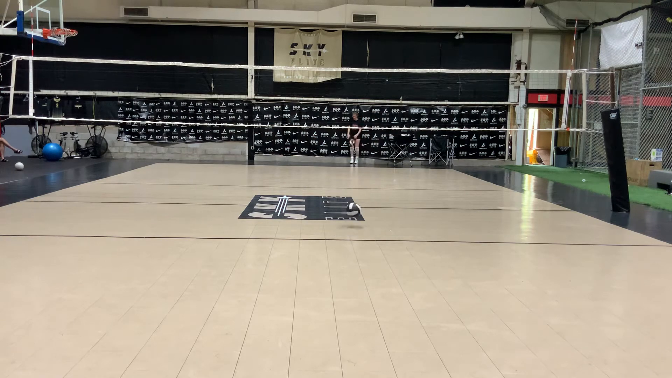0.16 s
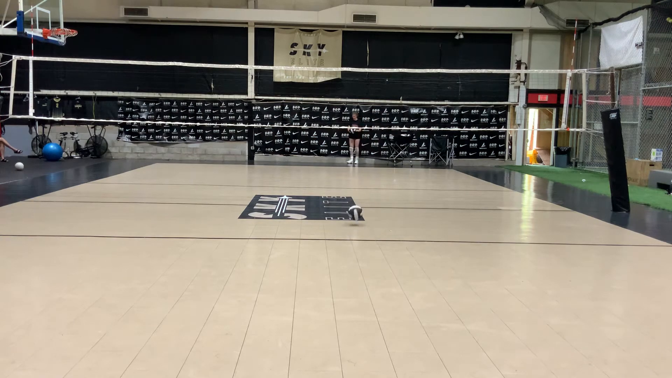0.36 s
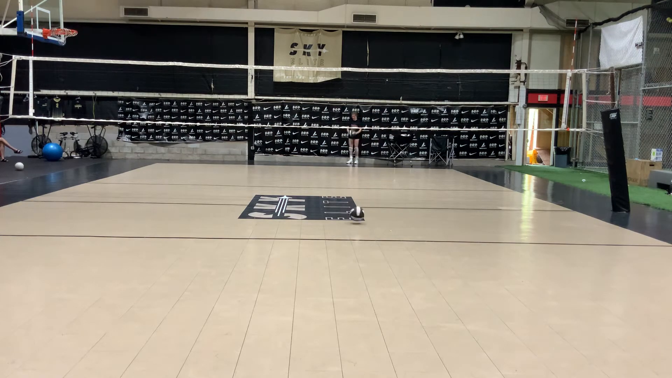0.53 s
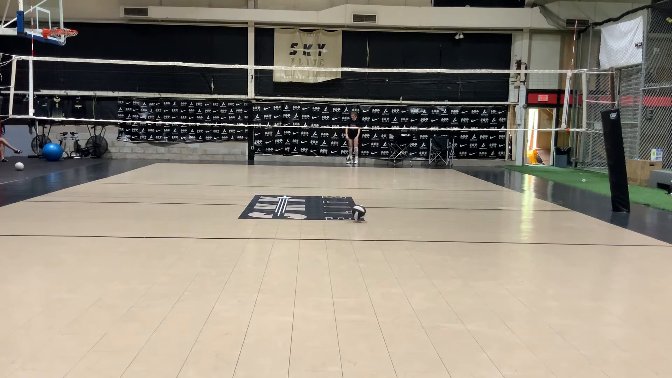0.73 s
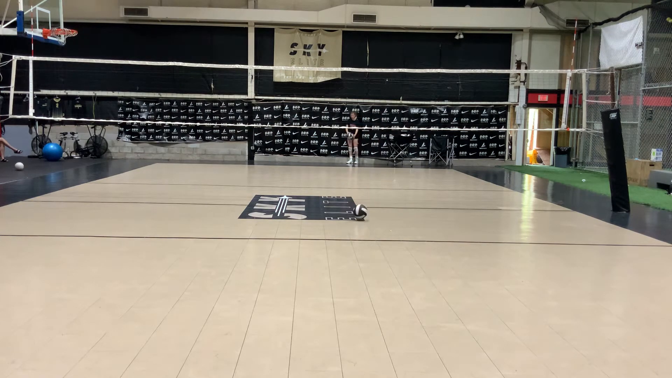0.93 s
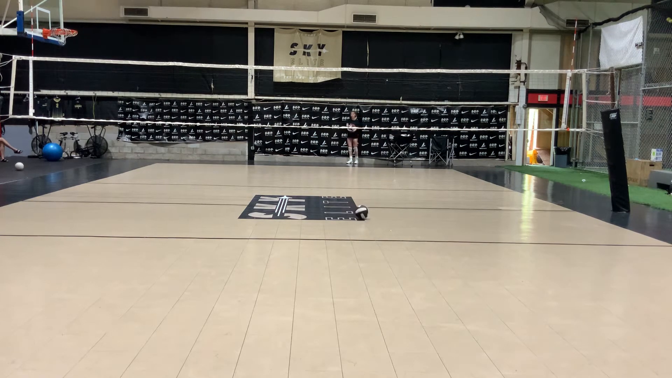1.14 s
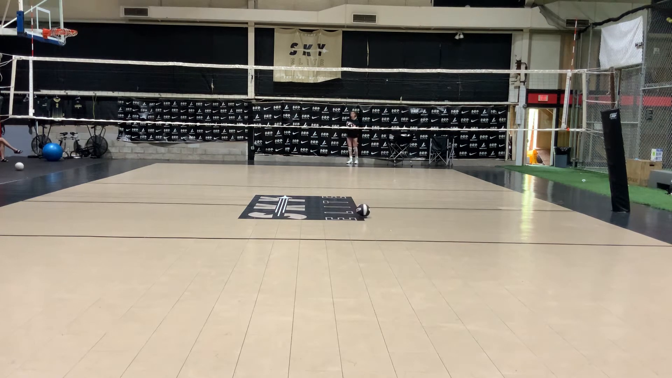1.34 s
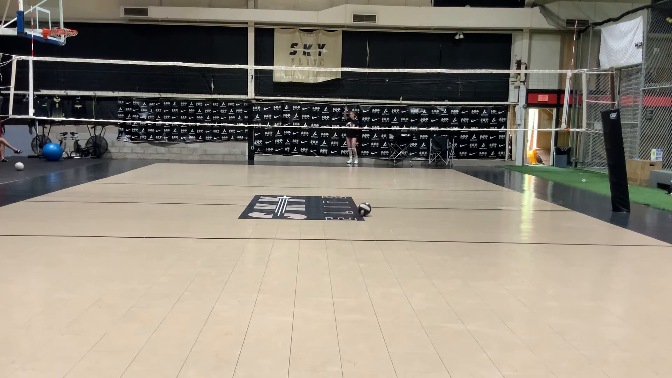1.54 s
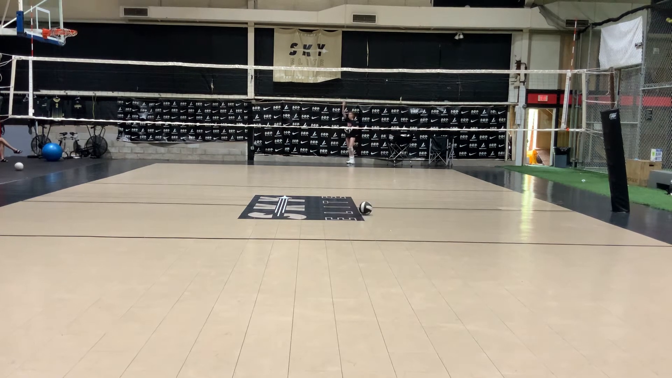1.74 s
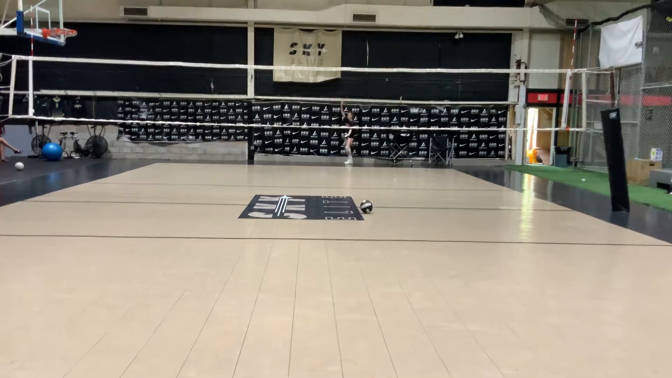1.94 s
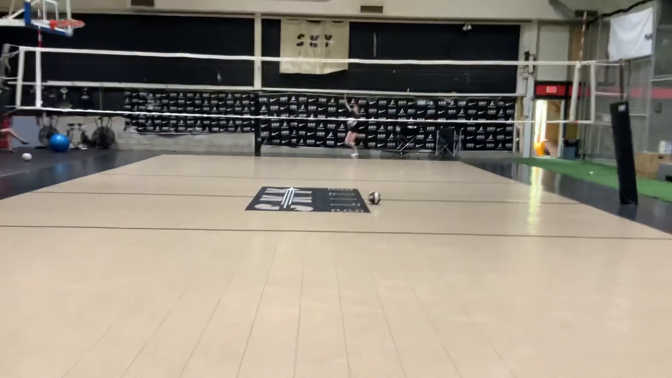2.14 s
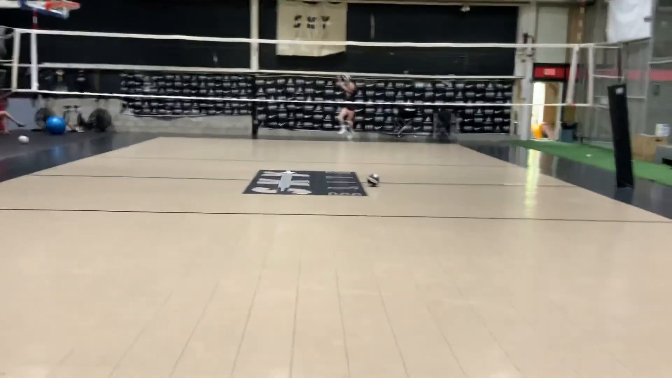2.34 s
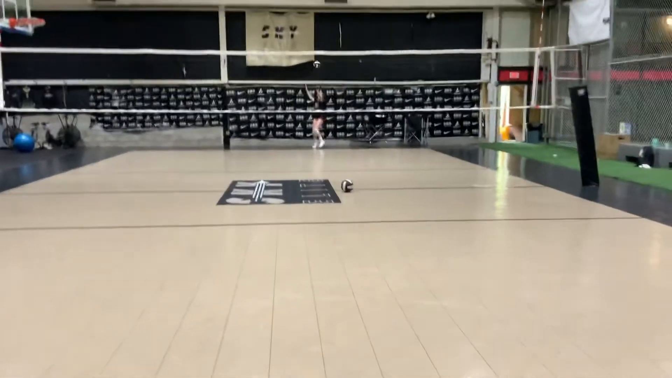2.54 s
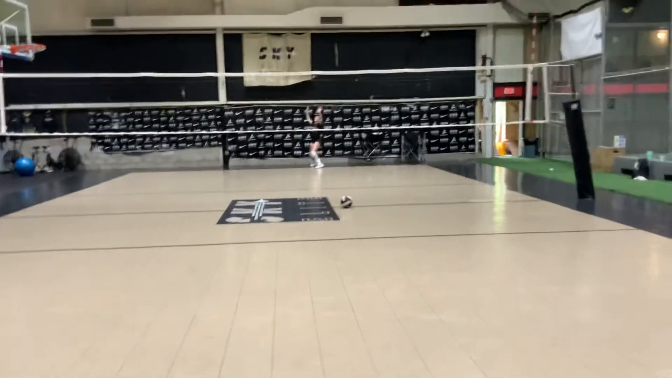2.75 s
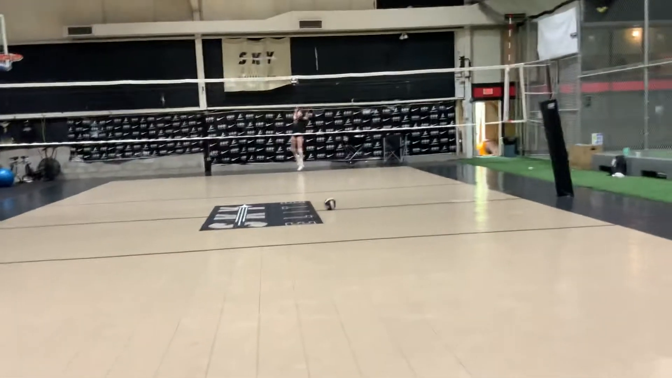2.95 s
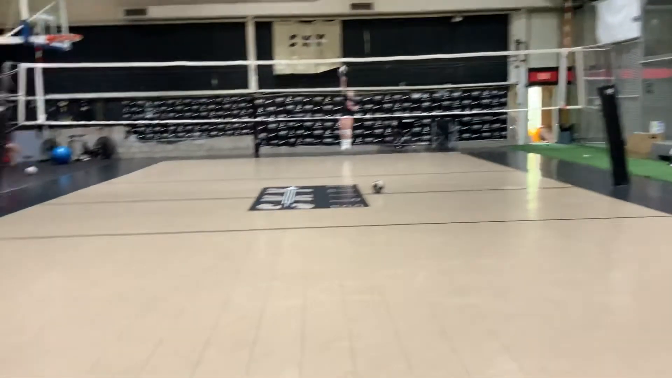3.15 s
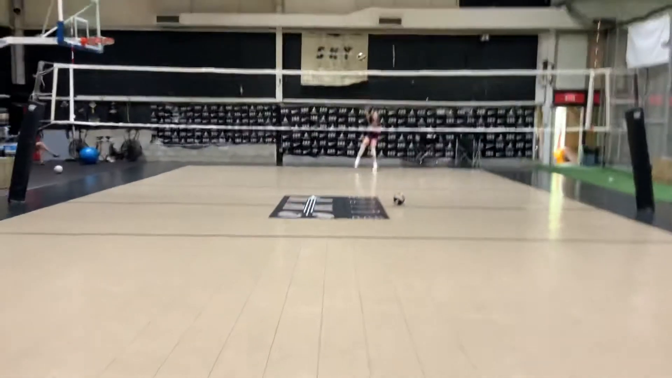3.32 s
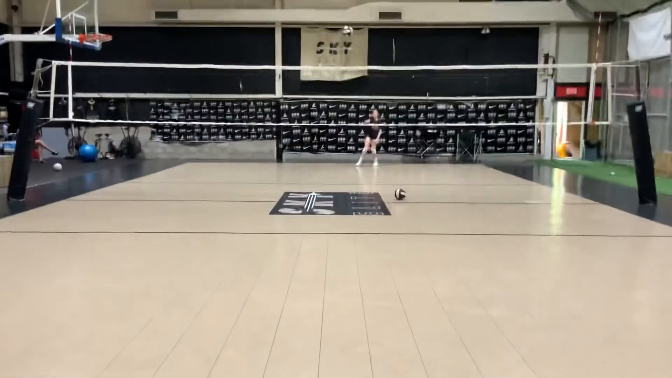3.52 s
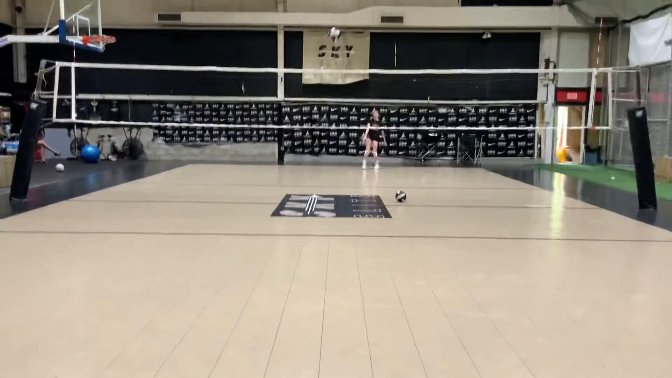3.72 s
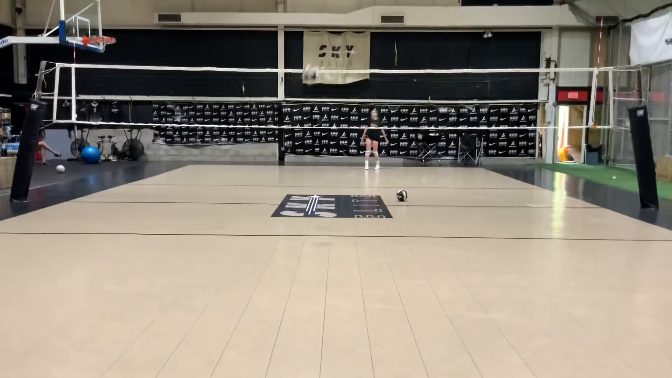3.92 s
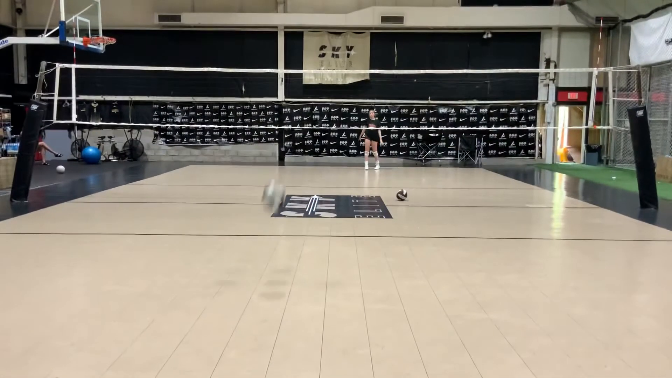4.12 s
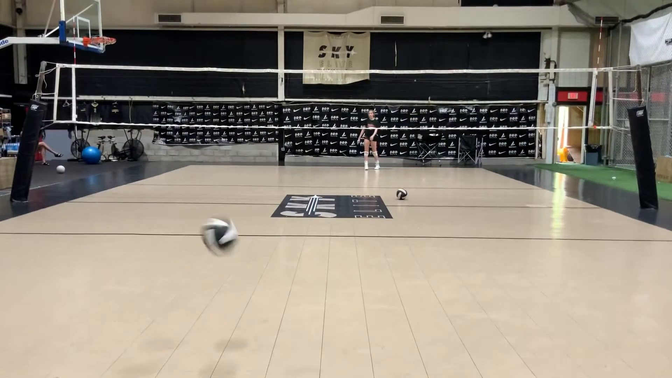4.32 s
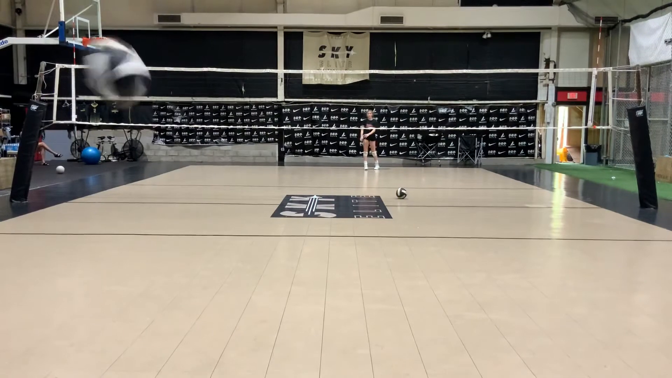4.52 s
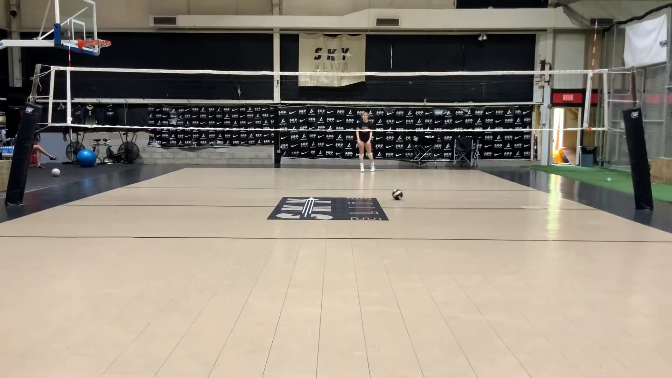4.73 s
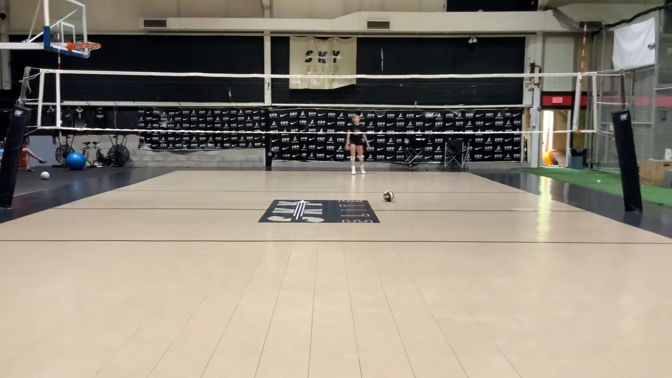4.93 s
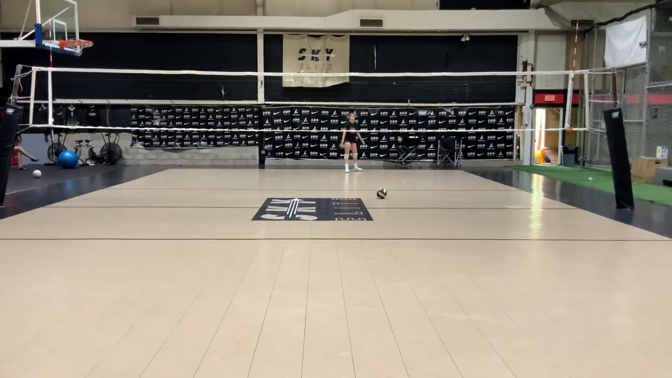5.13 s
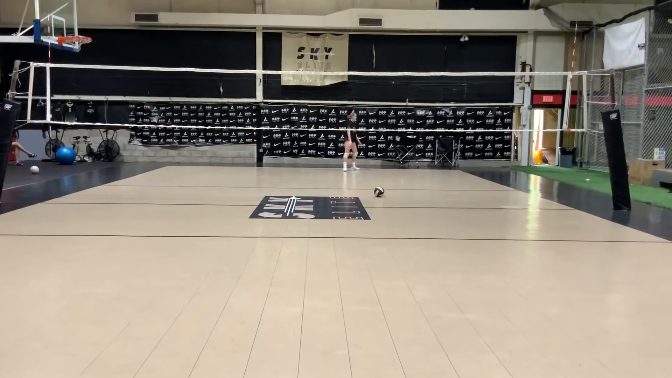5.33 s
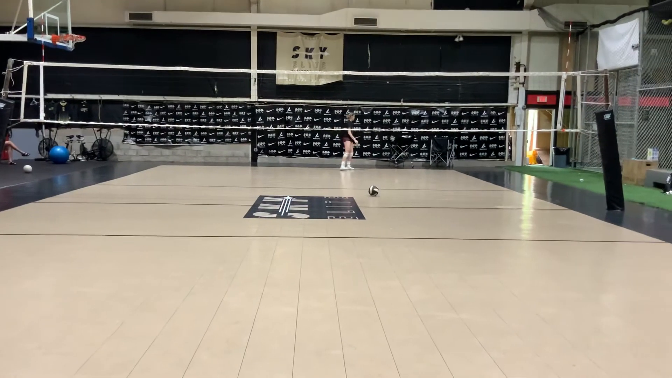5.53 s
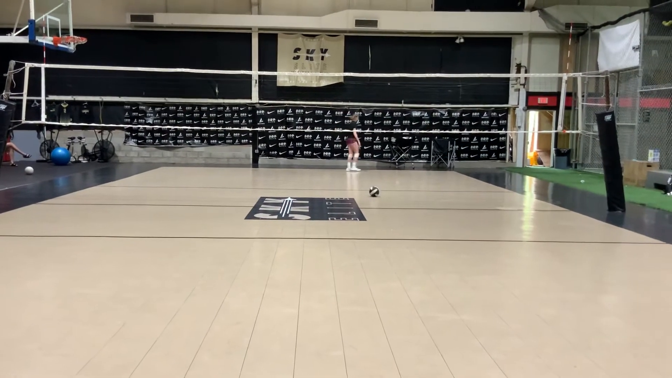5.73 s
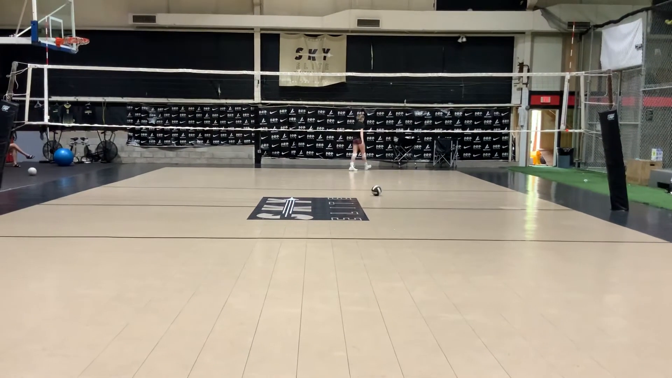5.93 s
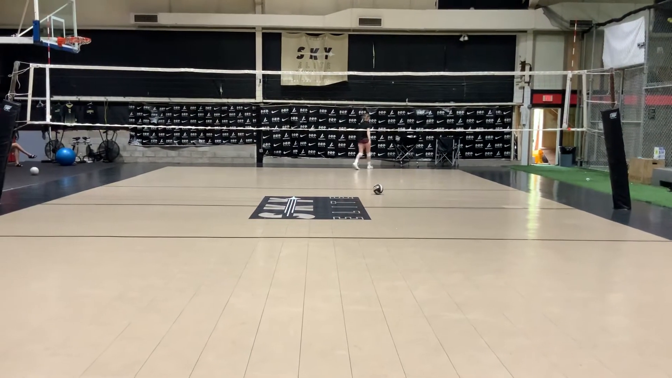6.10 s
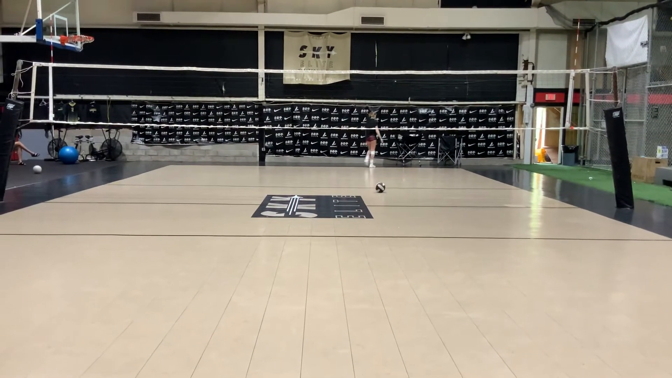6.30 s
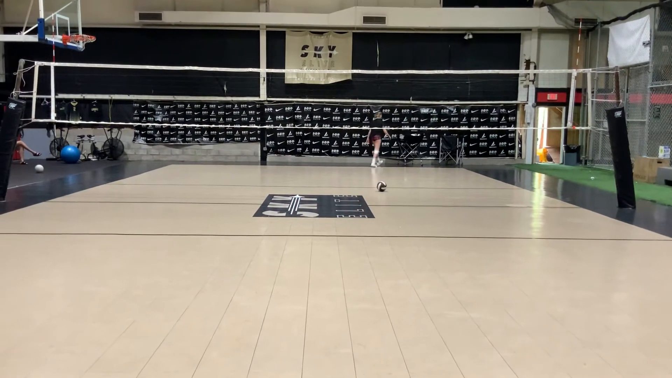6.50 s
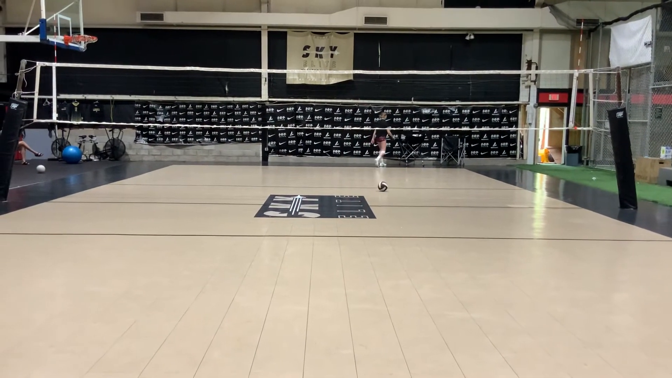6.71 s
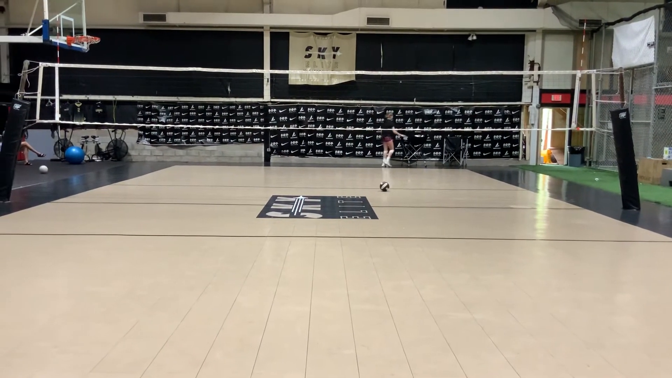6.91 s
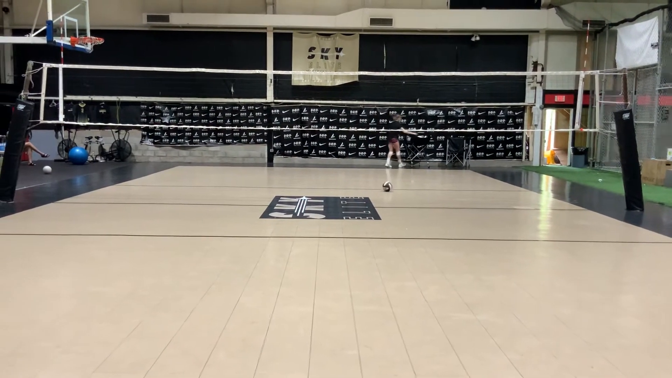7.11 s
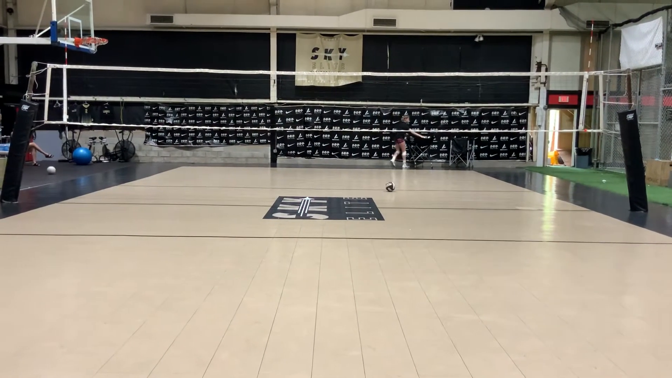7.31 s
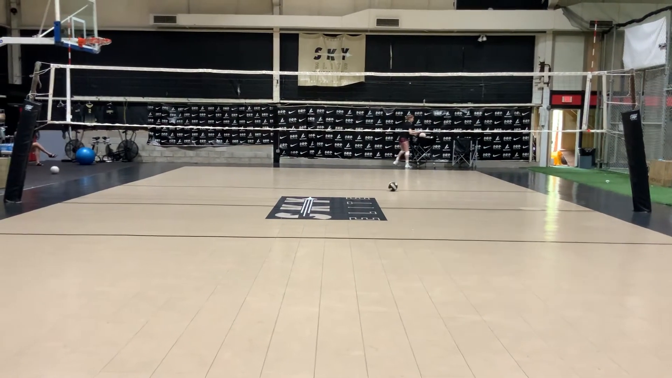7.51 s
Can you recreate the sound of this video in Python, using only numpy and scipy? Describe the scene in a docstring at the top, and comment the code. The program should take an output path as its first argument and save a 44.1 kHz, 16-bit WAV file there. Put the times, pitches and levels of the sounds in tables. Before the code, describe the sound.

Distant ball bounces and faint footsteps, a cracking serve ringing through a large gym, then a heavy nearby floor thud, net rustle and softer bounces.

```python
"""A low ventilation rumble fills a large sports hall while a volleyball is bounced twice at the far end.
Footsteps, small ticks and soft swishes are scattered through the scene; the ball is served, lands nearby,
brushes into netting and bounces three more times. Each blow on the ball is a slap of shaped noise
plus a falling chirp, the bending wave in the sprung floor. Fading noise makes the hall ring on."""
import sys
import numpy as np
from scipy import signal
from scipy.fft import rfft, irfft
from scipy.io import wavfile

SR = 44100
rng = np.random.default_rng(int(sys.argv[2]) if len(sys.argv) > 2 else 0)


def generate_wav(signal):
    """Clip the signal to [-1, 1] and save it as 16-bit WAV at the path in sys.argv[1]."""
    frames = np.transpose(np.atleast_2d(signal))
    scaled = np.clip(frames, -1, 1) * 32767
    pcm = np.round(scaled).astype(np.int16)
    wavfile.write(sys.argv[1], SR, pcm)


N = 337806

# ventilation spectrum, relative: pitch_hz, level_db (per Hz)
VENTILATION_SPECTRUM = [(12, -43), (20, -5.5), (55, -2), (107, -1.5), (172, -13), (234, -20.5),
                        (459, -35.5), (759, -35.5), (1330, -34), (2820, -41), (3440, -44), (6540, -48),
                        (9400, -47.5), (13900, -57.5), (16000, -80.5)]
# the server bounces the ball: start_s, knock_db, slap_db, slap_length_ms, skin_ring_hz, send_to_hall_db
SERVER_BOUNCES = [(0.0353, -64.5, -60, 0.82, 1390, 9), (0.7293, -70, -61, 1.85, 1380, 11)]
# echoes from the far end of the hall: delay_s, level_db, right_ear_later_ms
WALL_ECHOES = [(.0095, -13, 0.17), (0.022, -15, -0.13), (.044, -15, 0.39), (0.0792, -19.5, -0.37)]
# small ticks, mostly near the microphone; 7.239 is the ball's skin letting go, 7.292 the slap's roof echo.
# Levels are before the tick resonances: start_s, level_db, brightness_db_per_octave, ring_hz
SMALL_TICKS = [(.268, -70.5, -4, 8850), (0.554, -76, -4.5, 3900), (1.628, -78, 4, 13000),
               (1.802, -65.5, -1.7, 3900), (2.031, -67, 3, 5584), (2.0383, -58, 0.8, 9500),
               (2.094, -72, -5, 5596), (2.13, -74.5, -4.5, 2700), (2.358, -72, 1.5, 5700),
               (3.05, -74, -3, 5700), (3.543, -61.5, -5, 10920), (6.467, -80, 5.5, 5700),
               (7.239, -68.5, 1, 10000), (7.292, -71, -2, 2800), (7.459, -69, -3, 2480)]
# resonances that colour every tick, as of a small hard object: pitch_hz, width_hz, boost_db
TICK_RESONANCES = [(2720, 220, 5), (3950, 320, 5), (5800, 270, 5.5), (9600, 540, 5)]
# shoes on the far court, before the direct and hall mix: start_s, sole_knock_db, knock_hz, scuff_db
FOOTSTEPS = [(.29, -72, 314, -74), (.558, -71, 285, -74), (1.772, -75, 289.6, -89.5),
             (2.035, -70.5, 300, -83), (2.123, -77.5, 480, -88), (2.539, -69, 330, -66.5),
             (2.738, -68, 420, -76), (3.768, -77, 419, -74)]
# soft swishes: peak_s, half_length_s, pitch_hz, width_octaves, level_db
SWISHES = [(0.964, 0.053, 14100, 1.3, -70.5), (1.279, 0.095, 4250, 0.26, -69),
           (1.67, .09, 12000, 0.67, -79), (2.036, 0.07, 577, 1.35, -65.5), (2.998, 0.074, 1470, 1.075, -72),
           (4.783, 0.24, 11260, 1.8, -68.5), (6.255, 0.065, 2125, 0.36, -79.5)]
# the serve, the smack of the palm and a louder crack just after it: start_s, thud_db, knock_db, slap_db,
# slap_length_ms, brightness_db_per_octave, skin_ring_hz, skin_ring_db
SERVE_BLOWS = [(3.1462, -46.5, -53.5, -43.5, 1.0, -1.4, 1185, 11),
               (3.1597, -41.5, -47, -34.5, 1.8, 0, 4375, 1)]
# bounces close by: start_s, thud_db, knock_db, knock_hz, knock_width_octaves, slap_db, slap_length_ms,
# skin_ring_hz, skin_ring_db, right_ear_later_ms
NEAR_BOUNCES = [(4.2009, -29.5, -47.5, 297, 0.57, -35, 0.87, 1437, 3, -0.2),
                (5.756, -36, -51.5, 433, 0.71, -65.5, 3.5, 4530, 13, 0.717),
                (6.6344, -43.5, -50.5, 365, 0.54, -70.5, 4.2, 4950, 11.5, .8),
                (7.2331, -48, -39, 328, 0.41, -57, 1.8, 908, 6, 0.708)]
# basic colour of the noise in each kind of contact: pitch_hz, level_db
FAR_SLAP_SPECTRUM = [(150, -10), (500, 0.5), (800, 0.5), (1200, -2), (1750, -4), (2500, 0), (3300, -5),
                     (4300, -4.5), (5600, -12), (7600, -11), (10000, -15.5), (15500, -15.5)]
TICK_SPECTRUM = [(150, -15.5), (500, 3), (1400, -3), (2700, 5), (5000, 2), (8000, 3), (11000, -2),
                 (15500, 4)]
PALM_SLAP_SPECTRUM = [(150, -16.5), (480, -7.5), (750, 0), (1200, -4), (1750, -6.5), (2500, -1),
                      (3300, -2.5), (4300, 1), (5600, 1.5), (7600, 0), (10000, -10.5), (15500, -18.5)]
NEAR_SLAP_SPECTRUM = [(150, -8), (500, -0.5), (1050, -3), (1450, -1), (1750, -8), (2200, 3), (3000, -4),
                      (4200, -6), (5300, -15), (7600, -13.5), (10000, -20.5), (15500, -20.5)]
RUSTLE_SPECTRUM = [(150, -8), (500, 1), (900, -1), (2000, -6.5), (4000, -7.5), (6000, -7.5), (10000, -16),
                   (15500, -26)]
# time the hall takes to fade by 60 dB: pitch_hz, fade_s
HALL_FADE = [(60, 1.6), (130, 2.5), (260, 1.2), (500, 1.1), (1000, 1.45), (2200, 1.905), (4000, 1.61),
             (6000, 1.1), (9000, .8), (15000, 0.21)]
# dips in the microphone's response: pitch_hz, width_hz, change_db
PORT_DIPS = [(507, 50, -3.5), (827, 79, -1), (5050, 260, -4), (6650, 300, -8), (8530, 270, -11),
             (14900, 350, -8)]
# the right microphone port is brighter: pitch_hz, left_minus_right_db
PORT_BALANCE = [(100, 1), (1000, -0.8), (2200, -0.5), (4000, -3.5), (8000, -1.5), (14000, -3.1)]

# short sounds are SIZE samples long; HZ and MS are their frequency and time axes
SIZE = 8192
HZ = np.maximum(np.fft.rfftfreq(SIZE, 1 / SR), 1)
MS = np.arange(SIZE) / SR * 1000
EARS = np.array([[1], [-1]])  # left, right

VENTILATION_DB = -54
SKIN_OCTAVES = 0.2  # width of the ball skin's ring
DRIBBLE_THUD_DB, DRIBBLE_THUD_HZ, DRIBBLE_BOOM_DB = -58, 95.6, 9  # boom: thud sent into the hall
DRIBBLE_KNOCK_HZ, DRIBBLE_RING_DB = 270, 1
TICK_MS, TICK_PAN_DB, TICK_HALL_DB = 2.1, 3, -14.5
SCUFF_MS, SCUFF_DB_PER_OCTAVE = 3.5, -1.6
SERVE_THUD_HZ, SERVE_KNOCK_HZ, SERVE_HALL_DB, SERVE_BOOM_DB = 112, 218, 3, 2
# the hardest landing; a softer ball stays down longer, so its thud is lower and later
HARD_DB, HARD_THUD_HZ, HARD_TRAVEL_MS = -29, 126.3, 14.08  # travel through the floor at 100 Hz
CONTACT_OCTAVES_PER_DB = 0.022
SKID_DB_PER_OCTAVE = 2.2  # the slap brightens for each doubling of its length beyond 1 ms
# the first echo off the roof, and each later round trip between roof and floor
ROOF_S, FLUTTER_S = 0.0576, 0.071
# the netting snaps taut, then its cords rub on the ball, ever more weakly
NET_S, SNAP_DB, SNAP_MS, NET_DB_PER_OCTAVE = 4.8666, -56, 1.68, 1.5
RUB_DB, RUB_MS, RUB_GAP_S, RUB_FADE_DB_PER_S = -62, 8.4, 0.009, 97
TOP_HZ = 16000


def undb(db):
    """Turn decibels into a gain."""
    return 10 ** (np.asarray(db) / 20)


def curve(points, hz):
    """Read a (pitch, value) table, spacing pitches by ratio as the ear does."""
    pitches, values = np.transpose(points)
    return np.interp(np.log(np.maximum(hz, 1)), np.log(pitches), values)


def hump(hz, centre, octaves):
    """A bell-shaped resonance on the octave axis."""
    distance = np.log2(np.maximum(hz, 1) / centre)
    return np.exp(-(distance / octaves) ** 2 / 2)


def peaks_db(table):
    """Add up bell-shaped peaks or dips, in dB, from a table of pitch, width and height."""
    return sum(db * np.exp(-((HZ - hz) / width) ** 2) for hz, width, db in table)


def energy(x, db):
    """Scale a short sound to an energy in dB, where 0 is full scale for one second."""
    return x * undb(db) / np.sqrt(np.sum(x ** 2) / SR)


def causal(gain):
    """Minimum-phase response for a gain curve: it rings only after the blow."""
    cepstrum = irfft(np.log(gain + 1e-6))
    cepstrum[1:SIZE // 2] *= 2
    cepstrum[SIZE // 2 + 1:] = 0
    return np.exp(rfft(cepstrum))


def add(track, start_s, x):
    """Mix x into the track at its start time."""
    i = max(int(start_s * SR), 0)
    n = max(min(x.shape[-1], N - i), 0)
    track[..., i:i + n] += x[..., :n]


def place(x, right_later_ms, pan_db):
    """Place a sound by the delay and level difference between the two microphone ports."""
    late_s = np.maximum(-EARS * right_later_ms, 0) / 1000
    delayed = irfft(rfft(x) * np.exp(-2j * np.pi * HZ * late_s))
    return delayed * (MS < MS[-1] / 2) * undb(EARS * pan_db / 2)


def diffuse(size, apart_hz=330):
    """Spectrum of stereo noise from all sides: alike in the bass, unrelated above."""
    hz = np.fft.rfftfreq(size, 1 / SR)
    mid, side = rfft(rng.standard_normal((2, size)))
    alike = 1 / (1 + (hz / apart_hz) ** 2)
    stereo = mid * np.sqrt(1 + alike) + EARS * side * np.sqrt(1 - alike)
    return hz, stereo / np.sqrt(2)


def ventilation():
    """Steady duct rumble with a faint hiss, filling the hall: noise shaped by a spectrum."""
    hz, noise = diffuse(N, apart_hz=260)
    air = irfft(noise * undb(curve(VENTILATION_SPECTRUM, hz)), N)
    return air / air.std() * undb(VENTILATION_DB)


def slap(spectrum, db, length_ms, tilt_db, ring_hz=1000, ring_db=0):
    """Air squeezed out of a closing contact: a quickly dying crackle with an optional ring of the surface."""
    age = MS / max(length_ms, 0.1)
    burst = rfft(rng.standard_normal(SIZE) * age * np.exp(-age))
    # even out the random spectrum before colouring it
    power = abs(burst) ** 2
    burst /= np.sqrt(power + np.mean(power) / 10)
    tilt = tilt_db * np.log2(np.maximum(HZ, 200) / 2000)
    skin_ring = ring_db * hump(HZ, ring_hz, SKIN_OCTAVES)
    colour = undb(curve(spectrum, HZ) + tilt + skin_ring)
    return energy(irfft(burst * causal(colour)) * (MS < MS[-1] * 3 / 4), db)


def bending(gain, db, travel_ms):
    """A pulse through the boards: speed grows with the root of frequency, so it arrives as a falling chirp."""
    phase = 4 * np.pi * travel_ms / 1000 * np.sqrt(100 * HZ)  # travel time is given at 100 Hz
    chirp = irfft(1j * gain * np.exp(-1j * phase))
    return energy(chirp * (MS < MS[-1] / 2), db)


def thud(db, hz, travel_ms, rise=2.8, fall=2.42):
    """The ball flattens and springs back; its contact time sets the pitch of the push."""
    ratio = HZ / hz
    return bending(ratio ** rise * np.exp(-rise / fall * ratio ** fall), db, travel_ms)


def knock(db, hz, octaves, travel_ms):
    """The struck floor panel answers with one broad, heavily damped resonance."""
    return bending(hump(HZ, hz, octaves), db, travel_ms)


def far_blow(start_s, spectrum, thud_db, thud_hz, knock_db, knock_hz, slap_db, length, ring_hz, ring_db,
             hall_db, boom_db, tilt=0, echo_db_per_octave=-0.1):
    """Direct sound and hall feed of one blow on the ball at the far end, with its echoes off the walls."""
    direct, feed = np.zeros((2, N)), np.zeros(N)
    low = thud(thud_db, thud_hz, travel_ms=9, rise=1.5, fall=2.5)
    panel = knock(knock_db, knock_hz, octaves=0.49, travel_ms=10)
    crack = panel + slap(spectrum, slap_db, length, tilt, ring_hz, ring_db)
    add(direct, start_s, place(low, right_later_ms=0, pan_db=2.5))
    add(direct, start_s, place(crack, right_later_ms=-0.067, pan_db=-0.5))
    add(feed, start_s, undb(boom_db) * low + undb(hall_db) * crack)
    for delay_s, echo_db, right_later_ms in WALL_ECHOES:
        # a cluttered wall scatters each echo into a slap of its own
        echo = slap(spectrum, slap_db + echo_db, length, tilt + echo_db_per_octave, ring_hz, ring_db)
        add(direct, start_s + delay_s, place(echo, right_later_ms, pan_db=0))
    return direct, feed


def server_bounces():
    """The server bounces the ball: floor thud and knock with a slap of the skin, heard from afar."""
    direct, feed = np.zeros((2, N)), np.zeros(N)
    for start_s, knock_db, slap_db, length, ring_hz, hall_db in SERVER_BOUNCES:
        blow, blow_feed = far_blow(
            start_s, FAR_SLAP_SPECTRUM, DRIBBLE_THUD_DB, DRIBBLE_THUD_HZ, knock_db, DRIBBLE_KNOCK_HZ,
            slap_db, length, ring_hz, DRIBBLE_RING_DB, hall_db, DRIBBLE_BOOM_DB)
        direct += blow
        feed += blow_feed
    return direct, feed


def small_ticks(ring_db=5, between_modes_db=-2):
    """Small ticks: short crackles, each with a ring of its own, all coloured by the same resonances."""
    ticks = np.zeros((2, N))
    body = causal(undb(between_modes_db + peaks_db(TICK_RESONANCES)))
    for start_s, db, tilt, ring_hz in SMALL_TICKS:
        # each ear gets its own crackle, the left one louder
        levels_db = [db + ear * TICK_PAN_DB / 2 for ear in EARS]
        tick = [slap(TICK_SPECTRUM, level, TICK_MS, tilt, ring_hz, ring_db) for level in levels_db]
        add(ticks, start_s, irfft(rfft(np.array(tick)) * body))
    return ticks, undb(TICK_HALL_DB) * ticks[0]


def footsteps(hall_db=2.0, direct_db=-5):
    """A sole knocks on the boards and scuffs: more is sent to the hall than is heard directly."""
    shoes = np.zeros(N)
    for start_s, knock_db, knock_hz, scuff_db in FOOTSTEPS:
        sole = knock(knock_db, knock_hz, octaves=0.85, travel_ms=4.4)
        scuff = slap(FAR_SLAP_SPECTRUM, scuff_db, SCUFF_MS, SCUFF_DB_PER_OCTAVE)
        add(shoes, start_s, sole + scuff)
    return undb(direct_db) * shoes, undb(hall_db) * shoes


def swishes():
    """Bands of hiss that swell and fade: noise around one pitch under a bell-shaped envelope."""
    out = np.zeros((2, N))
    t = np.arange(SR) / SR - 0.5
    for peak_s, half_s, centre, octaves, db in SWISHES:
        hz, noise = diffuse(SR)
        hiss = irfft(noise * hump(hz, centre, octaves), SR)
        swell = np.exp(-(t / half_s) ** 2)
        add(out, peak_s - 0.5, energy(hiss * swell, db))
    return out


def serve():
    """The palm strikes the ball: two quick blows, each with a thud, a knock and a slap."""
    direct, feed = np.zeros((2, N)), np.zeros(N)
    for start_s, thud_db, knock_db, slap_db, length, tilt, ring_hz, ring_db in SERVE_BLOWS:
        blow, blow_feed = far_blow(
            start_s, PALM_SLAP_SPECTRUM, thud_db, SERVE_THUD_HZ, knock_db, SERVE_KNOCK_HZ,
            slap_db, length, ring_hz, ring_db, SERVE_HALL_DB, SERVE_BOOM_DB, tilt)
        direct += blow
        feed += blow_feed
    return direct, feed


def near_bounces(boom_db=-10.5, knock_hall_db=-18, slap_hall_db=-9, knock_delay=0.87,
                 bloom_db=-19, bloom_ms=9, bloom_s=0.03, flutter_db=-19, loss_db=-1.82):
    """The ball lands close by: thud, panel knock and slap; the thud flutters between floor and roof."""
    direct, feed = np.zeros((2, N)), np.zeros(N)
    for (start_s, thud_db, knock_db, knock_hz, octaves, slap_db, length,
         ring_hz, ring_db, right_later_ms) in NEAR_BOUNCES:
        contact = 2 ** (CONTACT_OCTAVES_PER_DB * (HARD_DB - thud_db))  # contact time, hardest landing = 1
        travel_ms = HARD_TRAVEL_MS * contact
        tilt = SKID_DB_PER_OCTAVE * np.log2(length)
        low = thud(thud_db, HARD_THUD_HZ / contact, travel_ms)
        panel = knock(knock_db, knock_hz, octaves, knock_delay * travel_ms)
        skin = slap(NEAR_SLAP_SPECTRUM, slap_db, length, tilt, ring_hz, ring_db)
        for sound, pan_db in [(low, 1.4), (panel, 3.5), (skin, 7.5)]:
            add(direct, start_s, place(sound, right_later_ms, pan_db))
        add(feed, start_s, undb(boom_db) * low + undb(knock_hall_db) * panel + undb(slap_hall_db) * skin)
        # the roof trusses scatter the slap back as a short bloom
        bloom = [slap(NEAR_SLAP_SPECTRUM, slap_db + bloom_db, bloom_ms, tilt, ring_hz, ring_db)
                 for ear in EARS]
        add(direct, start_s + bloom_s, np.array(bloom))
        for trip in range(8):
            echo = undb(flutter_db + trip * loss_db) * low
            add(direct, start_s + ROOF_S + trip * FLUTTER_S, echo)
    return direct, feed


def cords(db, length_ms):
    """Net cords against the ball: a crackle drawn separately for each ear."""
    return np.array([slap(RUSTLE_SPECTRUM, db, length_ms, NET_DB_PER_OCTAVE) for ear in EARS])


def netting(hall_db=-6, count=4):
    """The netting snaps taut and rustles as it stops the ball: one snap, then fading rubs."""
    net = np.zeros((2, N))
    add(net, NET_S, cords(SNAP_DB, SNAP_MS))
    for age_s in RUB_GAP_S * (np.arange(count) + 0.5):
        add(net, NET_S + age_s, cords(RUB_DB - RUB_FADE_DB_PER_S * age_s, RUB_MS))
    return net, undb(hall_db) * net[0]


def hall(onset_s, before, early_db, early_s, grain):
    """Stereo response: grainy early reflections, then a tail whose treble the air soaks up."""
    size = 2 * SR
    t = np.arange(size) / SR
    hz, noise = diffuse(size)
    # overlapping pitch bands, each with its own fading time
    centres = np.geomspace(40, 16000, 18)
    tail = 0
    for centre, share in zip(centres, np.eye(len(centres))):
        band = irfft(noise * curve(np.c_[centres, share], hz), size)
        tail = tail + band * undb(-60 * t / curve(HALL_FADE, centre))
    # the roof and far walls join in only after their travel time
    opening = before + (1 - before) * (1 + np.tanh((t - onset_s) / 0.004)) / 2
    # random steps of 90 samples make the early reflections uneven
    steps = np.repeat(rng.standard_normal(size // 90 + 1), 90)[:size]
    mirrors = np.exp(grain * np.exp(-t / 0.12) * steps)
    early = 1 + undb(early_db) * np.exp(-t / early_s)
    shape = opening * mirrors * early
    return tail * shape / np.sqrt(np.sum((shape * np.exp(-4.6 * t)) ** 2))


def ring(x, response):
    """Play a track through a stereo response."""
    return signal.fftconvolve(x[None], response, axes=1)[:, :N]


def scene():
    """Near and far sources each excite the hall in their own way."""
    air = ventilation()
    dribble, dribble_feed = server_bounces()
    ticks, ticks_feed = small_ticks()
    steps, steps_feed = footsteps()
    hiss = swishes()
    served, served_feed = serve()
    near, near_feed = near_bounces()
    net, net_feed = netting()
    near_hall = hall(onset_s=0.05, before=0.42, early_db=4, early_s=0.037, grain=0.32)
    far_hall = hall(onset_s=0.006, before=0.26, early_db=1.0, early_s=0.024, grain=0.29)
    # the ticks and netting share the far hall response
    far_feed = dribble_feed + ticks_feed + steps_feed + served_feed + net_feed
    reverberation = ring(near_feed, near_hall) + ring(far_feed, far_hall)
    return air + dribble + ticks + steps + hiss + served + near + net + reverberation


def record(dry):
    """The microphone ports colour the sound, the loudest peaks are rounded, and the very top is cut."""
    dips_db = peaks_db(PORT_DIPS)
    balance_db = curve(PORT_BALANCE, HZ)
    ports = np.array([irfft(causal(undb(dips_db + ear * balance_db / 2))) for ear in EARS])
    heard = signal.fftconvolve(dry, ports[:, :SIZE // 8], axes=1)[:, :N]
    rounded = heard / (1 + (heard / 0.85) ** 6) ** (1 / 6)
    top_cut = signal.ellip(8, 0.2, 70, TOP_HZ, fs=SR, output="sos")
    return signal.sosfilt(top_cut, rounded)


dry = scene()
out = record(dry)
generate_wav(out)
```